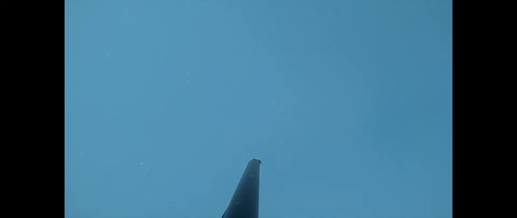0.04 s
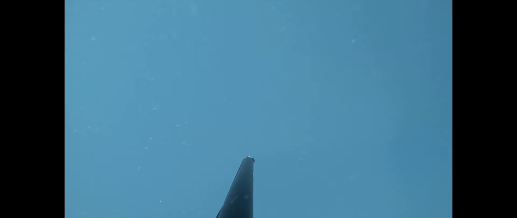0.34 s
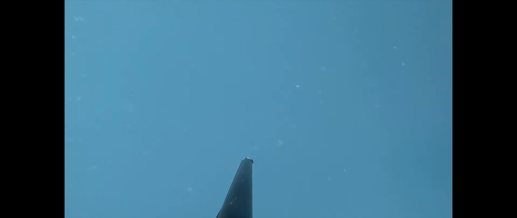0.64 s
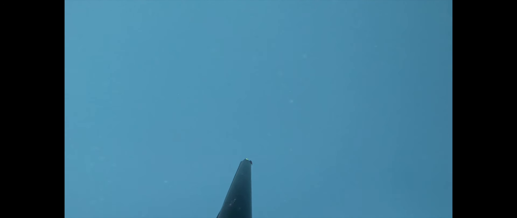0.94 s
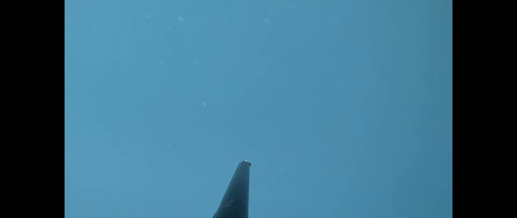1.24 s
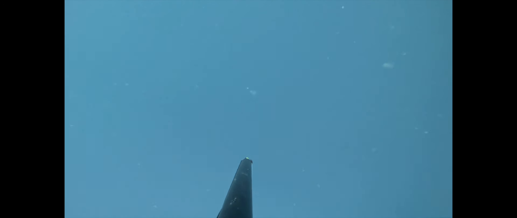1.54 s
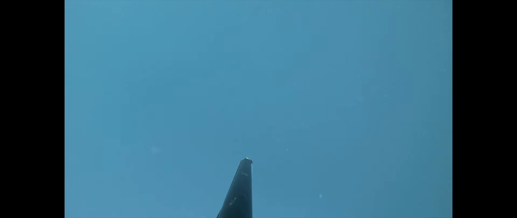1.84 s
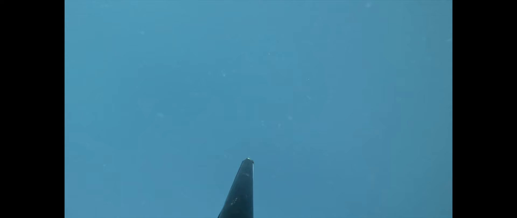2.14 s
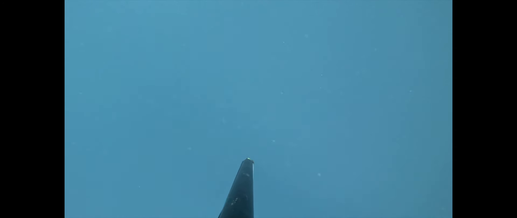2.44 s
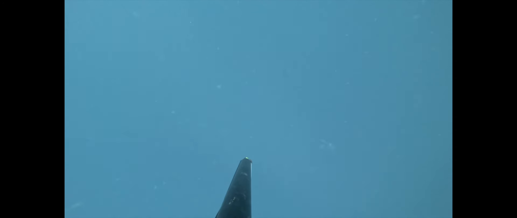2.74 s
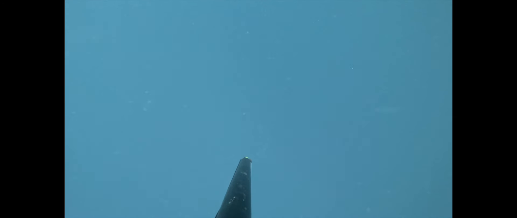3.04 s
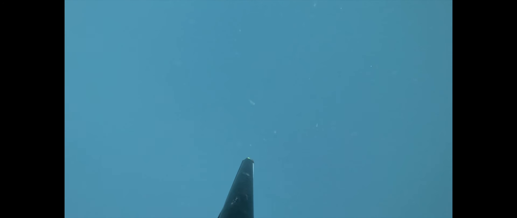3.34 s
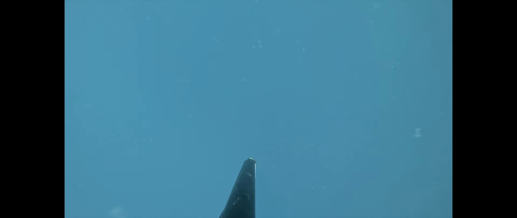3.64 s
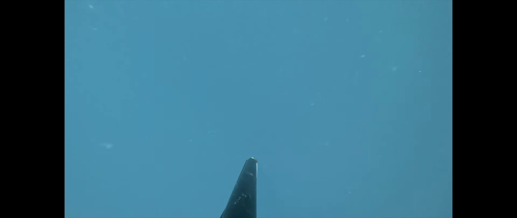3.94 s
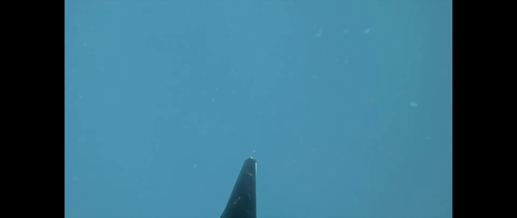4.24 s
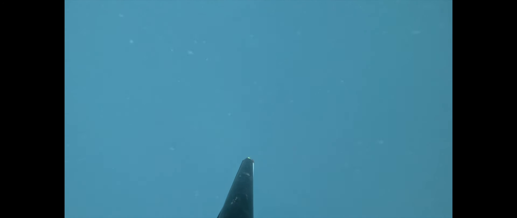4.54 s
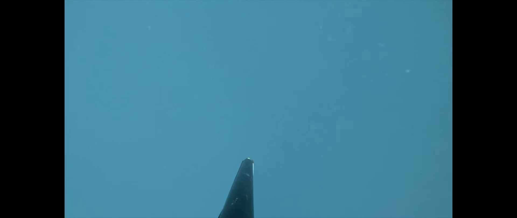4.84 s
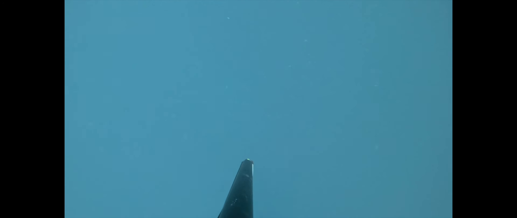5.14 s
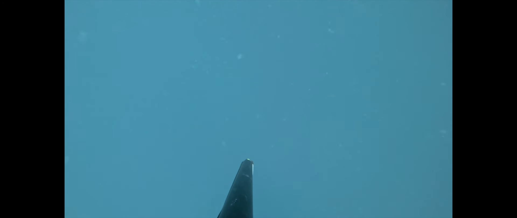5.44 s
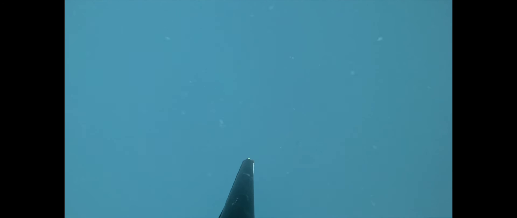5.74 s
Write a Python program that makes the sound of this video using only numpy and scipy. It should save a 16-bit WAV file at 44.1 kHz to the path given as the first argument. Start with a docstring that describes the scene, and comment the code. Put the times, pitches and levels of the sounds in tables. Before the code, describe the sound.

Underwater, eddies rumble and gurgle against the case of a travelling camera, close and muffled. Tiny bubbles fizz, ring and briefly rush past among quiet snaps. A deep thump rocks the housing midway, followed by a few hollow knocks as the flow grows a little brighter. Toward the end a thin, regular click and a faint, quick ringing rattle from loose gear join the rumble.

```python
"""Open water, heard from a camera carried along in a waterproof housing. Eddies rumble and gurgle on the
case, and the wash swells, brightens and hums as it gathers speed. Froth, fine crackle and sharp snaps
sound through the shell; small bubbles ring or burst, and clouds of them rush by. The case is bumped and
rapped, and late on loose gear starts to click and chatter in the flow, all over faint microphone hiss."""
import sys
import numpy as np
from scipy.fft import rfft, irfft, next_fast_len
from scipy.io import wavfile
from scipy.ndimage import uniform_filter1d, map_coordinates

SR = 44100
rng = np.random.default_rng(int(sys.argv[2]) if len(sys.argv) > 2 else 0)


def unload_audio(sound):
    """Save the sound as a 16-bit wav file, at the path given as the first command line argument."""
    columns = np.transpose(np.atleast_2d(sound))
    # keep every value between -1 and 1, then stretch to whole-number steps
    steps = np.round(np.clip(columns, -1, 1) * 32767)
    wavfile.write(sys.argv[1], SR, steps.astype(np.int16))


N = 260631


def amp(db):
    return 10 ** (np.asarray(db) / 20)


def unit(x):
    return x / np.sqrt(np.mean(x ** 2) + 1e-20)


def curves(rows):
    """Automation lanes: one value per sample for each column after the time."""
    s, *cols = np.transpose(rows)
    return [np.interp(np.arange(N) / SR, s, c) for c in cols]


def wobble(rate):
    """A smooth random curve, rate knots a second."""
    knots = rng.standard_normal(int(N * rate / SR) + 4)
    return map_coordinates(knots, [np.arange(N) * rate / SR])


def colour(x, points):
    """An EQ drawn through (frequency [Hz], gain [dB]) points; minimum phase keeps attacks sharp."""
    size = 2 * next_fast_len(x.shape[-1] // 2 + 2048)
    hz, db = np.transpose(points)
    gain = amp(np.interp(np.log(np.fft.rfftfreq(size, 1 / SR) + 1), np.log(hz), db))
    cepstrum = irfft(np.log(gain))
    fold = np.r_[1, np.full(size // 2 - 1, 2), np.zeros(size // 2)]
    response = np.exp(rfft(cepstrum * fold))
    return irfft(rfft(x, size) * response)[..., :x.shape[-1]]


def stereo(pair, side_db):
    """Two unrelated sounds as mid and side; side_db sets the width."""
    mid, side = pair[0], amp(side_db) * pair[1]
    return np.array([mid + side, mid - side])


def add(track, s, sound):
    """Mix a sound in at time s."""
    start = round(s * SR)
    track[start:start + len(sound)] += sound[:N - start]


def swell(sound, s, width):
    """A track on which the sound fades in and out on a bell curve cresting at time s."""
    track, start = np.zeros(N), max(s - 4 * width, 0)
    t = start + np.arange(len(sound)) / SR
    add(track, start, sound * np.exp(-((t - s) / width) ** 2 / 2))
    return track


def churn(spectrum, span):
    """Two turbulent noises of rms 1, their power evened out over span seconds."""
    noise = colour(rng.standard_normal((2, N)), spectrum)
    power = np.abs(uniform_filter1d(noise ** 2, max(int(span * SR), 1)))
    return noise / np.sqrt(power + 1e-12)


def crackle(spectrum, rate, spread_db, share, size=N):
    """Two streams of tiny pops over the hiss of countless far ones, rms 1; share is the pops' power."""
    strength = amp(spread_db * np.minimum(rng.exponential(size=(2, size)), 2.5))
    fires = rng.random((2, size)) < rate / SR
    pops = fires * strength * np.sign(rng.standard_normal((2, size)))
    far = rng.standard_normal((2, size))
    return unit(colour(np.sqrt(share) * unit(pops) + np.sqrt(1 - share) * far, spectrum))


def bursts(hits, tone, t60, attack):
    """Each hit (time [s], peak [dB]) rattles inside the shell: a short burst of shaped noise."""
    track, t = np.zeros(N), np.arange(SR // 10) / SR
    envelope = amp(-60 * t / t60) * (1 - np.exp(-t / attack))
    for s, db in hits:
        burst = colour(rng.standard_normal(len(t)) * envelope, tone)
        add(track, s, amp(db) * burst / np.abs(burst).max())
    return track


def bubble(hz, t60, rise=0.93, attack=0.0006):
    """A bubble rings at its own pitch, which creeps upward."""
    t = np.arange(SR // 10) / SR
    envelope = amp(-60 * t / t60) * (1 - np.exp(-t / attack))
    return envelope * np.sin(2 * np.pi * hz * t * (1 + rise * t))


def water():
    """Big eddies rock the case, smaller ones gurgle, and the wash grows louder and brighter with speed."""
    # slow eddies on the case: (time [s], deep sway level [dB], buffet level [dB])
    rumble_levels = [(0.0, -45, -60.5), (0.42, -48.5, -39.5), (0.56, -45.5, -51), (0.85, -46, -39.5),
                     (1.38, -42, -40.5), (1.55, -50, -45), (2.1, -46.5, -57), (2.54, -37.5, -50),
                     (2.78, -43.5, -49.5), (2.98, -34, -41), (3.17, -44, -49), (3.56, -43, -49.5),
                     (3.73, -45, -43), (4.45, -45.5, -51.5), (5.0, -36.5, -46), (5.33, -43, -41.5),
                     (5.55, -36.5, -48), (5.91, -60, -44.5)]
    # small eddies: (time [s], level [dB])
    gurgle_levels = [(0, -55), (1.1, -54), (1.7, -54.5), (2.0, -56), (2.6, -55), (3.4, -55), (4.8, -54),
                     (5.91, -55)]
    # pace through the water: (time [s], speed [0 is drifting, 1 is fast])
    pace = [(2.6, 0.25), (3.9, 0.9), (5.5, 1.184), (5.91, 1.1)]
    # the five bands of the flow, deepest first: (frequency [Hz], gain [dB])
    sway_tone = [(8, -18), (16, 2), (24, 8), (31, -0.5), (40, -16.5), (400, -120)]
    buffet_tone = [(22, -26.5), (33, -2.5), (42, 0.5), (47, -3), (54, -27.5), (90, -33), (900, -120)]
    gurgle_tone = [(40, -23.5), (60, 5), (80, 1), (112, 3.5), (135, -2.5), (200, -5.5), (270, -10),
                   (350, -29), (600, -36.5), (4000, -120)]
    wash_tone = [(140, -21.5), (230, 8), (295, 11), (360, 2.5), (470, -4.5), (620, -3), (830, -25),
                 (1200, -16.5), (9000, -100)]
    top_tone = [(250, -37), (520, -2), (670, 2.5), (790, -15.5), (1100, -12.5), (5000, -69)]
    sway_db, buffet_db = curves(rumble_levels)
    gurgle_db, = curves(gurgle_levels)
    speed, = curves(pace)
    sway = amp(sway_db + 1) * churn(sway_tone, span=0.15)
    buffet = amp(buffet_db + 1.5) * churn(buffet_tone, span=0.14)
    gurgle = amp(gurgle_db + 1.6 * wobble(22)) * churn(gurgle_tone, span=0.38)
    body = amp(-77 + 14 * speed) * churn(wash_tone, span=0.14)
    top = amp(-106 + 26 * speed) * churn(top_tone, span=0.11)
    wash = amp(2 * wobble(34)) * (body + top)
    return stereo(sway + buffet, side_db=-28) + stereo(gurgle, side_db=-20.5) + stereo(wash, side_db=-10)


def blips(centre_hz, scatter, spread_db, t60, count):
    """Many small bubbles ring at random moments, rms 1."""
    track = np.zeros(N)
    times = rng.uniform(0, N / SR - 0.01, count)
    variations = np.clip(rng.standard_normal((count, 2)), -2, 2)
    for s, (pitch, strength) in zip(times, variations):
        add(track, s, amp(spread_db * strength) * bubble(centre_hz * np.exp(scatter * pitch), t60))
    return unit(track)


def fizz(snap_tone, pops_per_s=17):
    """Froth rings the shell's low resonances, fine crackle its high ones; bubbles tick, pops stand out."""
    # drifting froth and fine crackle: (time [s], level [dB])
    froth_levels = [(0.0, -81), (0.55, -82.5), (0.78, -76.5), (1.25, -78), (1.85, -80.5), (2.15, -77),
                    (2.45, -83), (3.25, -77.5), (3.8, -82.5), (5.91, -79.5)]
    fine_levels = [(0, -81.5), (.36, -81.5), (.46, -76), (.6, -80.5), (1.14, -78), (1.35, -80.5),
                   (2.27, -79.5), (2.45, -80.5), (2.7, -78.5), (2.86, -79.5), (5.91, -79.5)]
    # low and high resonances of the shell: (frequency [Hz], gain [dB])
    froth_tone = [(350, -23), (580, 1.5), (930, -9), (1010, -3), (1130, -1), (1290, 2), (1420, -3.5),
                  (1630, -1), (1950, -5.5), (2300, -13), (3000, -14), (4500, -32.5)]
    fine_tone = [(1500, -30.5), (2500, -17.5), (2950, -5.5), (3600, -10), (4100, -1.5), (4720, -7),
                 (5020, 4.5), (5400, -2), (6600, -5.5), (7200, -2.5), (7800, 1), (8200, -10.5), (9800, -13),
                 (10700, -27.5), (14000, -49)]
    froth_db, = curves(froth_levels)
    fine_db, = curves(fine_levels)
    froth = stereo(crackle(froth_tone, rate=220, spread_db=7.5, share=0.33), side_db=-7)
    chinks = amp(-4.5) * blips(centre_hz=1441, scatter=0.13, spread_db=3, t60=0.049, count=300)
    pips = amp(-14) * blips(centre_hz=3044, scatter=0.1, spread_db=3.5, t60=0.034, count=110)
    sparks = amp(-12) * blips(centre_hz=5840, scatter=0.13, spread_db=1.5, t60=0.012, count=260)
    fine = stereo(crackle(fine_tone, rate=230, spread_db=5.5, share=0.36), side_db=-23.5)
    # near pops: (time [s], peak above the crackle [dB])
    pop_hits = rng.uniform((0, 7), (N / SR - 0.01, 13), (round(pops_per_s * N / SR), 2))
    pops = bursts(pop_hits, snap_tone, t60=0.009, attack=0.0002)
    low_layer = amp(froth_db - 0.62 + 1.4 * wobble(23.96)) * (froth + chinks + pips)
    high_layer = amp(fine_db + 1.3 * wobble(20)) * (fine + sparks + pops)
    return low_layer + high_layer


def hiss():
    """The faint noise of each microphone."""
    tone = [(500, 12.5), (2500, -8.5), (8000, -3), (10000, 3.5), (11500, -12)]
    return amp(-98) * unit(colour(rng.standard_normal((2, N)), tone))


def gurgles_and_hum():
    """Short low gurgles, and one long hum of the wash as it gathers speed."""
    # narrow, unsteady bands of noise: (crest time [s], level [dB], half-length [s], pitch [Hz])
    swells = [(.27, -48.5, 0.031, 86.4), (.46, -53, 0.034, 177), (.97, -54.5, 0.14, 191.7),
              (1.162, -48, 0.04, 106.4), (1.645, -48.5, 0.058, 111.4), (1.81, -56.5, 0.027, 197),
              (2.224, -56.5, 0.03, 206), (2.708, -53, 0.086, 111.7), (3.759, -55, .09, 117.3),
              (4.3, -63, 0.55, 290.4), (4.666, -47, 0.036, 80), (4.67, -58, .05, 301)]
    track = np.zeros(N)
    for s, db, width, hz in swells:
        band = [(hz / 3, -40), (hz / 1.36, -11), (hz, 0), (hz * 1.132, -11), (hz * 20, -120)]
        track += amp(db) * swell(churn(band, span=0.062)[0], s, width)
    return track


def splats():
    """Bubbles that burst against the case give wet ticks with only a hint of pitch."""
    # bursting bubbles: (time [s], peak [dB], band centre [Hz])
    ticks = [(0.289, -56.5, 3540), (0.293, -68, 3760), (0.925, -68, 3080), (3.198, -66.5, 3900),
             (4.202, -57, 4220), (4.211, -62, 4000), (4.2193, -61.5, 4000), (4.364, -61.5, 5600),
             (4.7238, -61.5, 4600), (4.745, -61.5, 4200)]
    track = np.zeros(N)
    for s, db, hz in ticks:
        band = [(hz / 4, -26), (hz / 1.6, -22), (hz / 1.05, -8), (hz, 0),
                (hz * 1.074, -3), (hz * 0.96, -20), (hz * 3, -45)]
        track += bursts([(s, db)], band, t60=0.014, attack=0.0006)
    return track


def raps():
    """Hard contacts give the case a short, hollow knock."""
    # raps on the housing: (time [s], peak [dB])
    knocks = [(0.289, -59), (0.8396, -60.5), (2.2794, -62), (2.7, -59), (4.2022, -50.5), (4.2105, -65),
              (4.2195, -54)]
    # the hollow of the case: (frequency [Hz], gain [dB])
    knock_tone = [(200, -8.5), (520, 18), (850, -1), (1250, 2.5), (1600, -15.5), (2400, -26), (6000, -46)]
    return bursts(knocks, knock_tone, t60=0.028, attack=0.0005)


def bumps(heave_hz=33):
    """A blow rings the water-damped case and heaves it to and fro."""
    # blows on the housing: (time [s], ring peak [dB], heave level [dB])
    blows = [(0.291, -44.5, -41.5), (2.991, -36, -24), (4.204, -55, -26.5), (4.256, -42, -59.5)]
    # modes of the case: (frequency [Hz], level [dB], t60 [s])
    case_modes = [(87.6, -1, 0.24), (138.5, 4.5, 0.15), (201, 7.5, 0.053), (287, -5, 0.066),
                  (381, -4.5, 0.13)]
    # water cushions each blow: (frequency [Hz], gain [dB])
    cushion = [(300, 3), (390, -4), (520, -21.5), (1500, -34)]
    track, t = np.zeros(N), np.arange(SR // 2) / SR
    for s, db, heave_db in blows:
        ring = sum(amp(level + rng.normal(0, 1) - 60 * t / t60) * np.sin(2 * np.pi * hz * t)
                   for hz, level, t60 in case_modes)
        thud = colour(ring * (1 - np.exp(-t / 0.0018)), cushion)
        heave_envelope = amp(heave_db - 60 * t / 0.25) * (1 - np.exp(-t / 0.008))
        heave = heave_envelope * np.sin(2 * np.pi * heave_hz * t)
        add(track, s, amp(db) * thud / np.abs(thud).max() + heave)
    return track


def snaps(snap_tone):
    """Sharp cracks ring the top of the shell; the nearer ones have more body."""
    # snaps in the water: (time [s], level [dB], body offset [dB])
    cracks = [(0.3664, -60.5, -12), (0.664, -58.5, -7), (0.704, -61.5, -14), (0.7523, -62, 5),
              (0.7928, -54.5, 0.5), (0.8402, -59.5, 3), (0.885, -68, -1), (2.279, -59, -11),
              (2.287, -58, -6), (2.3594, -56, -21), (2.6956, -63.5, 2), (2.7083, -58.5, 2),
              (2.7763, -61, -6), (2.9287, -55.5, -7), (3.0223, -62.5, -11), (3.198, -60.5, 2.5),
              (3.3898, -60.5, 3), (3.451, -60.5, -3), (3.892, -60, 5), (4.326, -60, -18), (4.354, -56, -11),
              (4.449, -55.5, -6.5), (4.621, -55, -2), (4.630, -60, -7), (5.556, -59.5, 3)]
    # the midrange under each crack: (frequency [Hz], gain [dB])
    body_tone = [(500, -2.5), (800, -15), (1300, 3), (1900, 3.5), (2300, -11), (3200, -3.5), (4500, -5),
                 (9000, -24.5)]
    crack = bursts([(s, db) for s, db, _ in cracks], snap_tone, t60=0.013, attack=0.0002)
    body = bursts([(s, db + offset) for s, db, offset in cracks], body_tone, t60=0.02, attack=0.0002)
    return amp(-1) * crack + amp(-6) * body


def rushes():
    """Clouds of small bubbles sweep past the case."""
    # frothy passes: (crest time [s], level [dB], half-length [s], band centre [Hz])
    passes = [(0.475, -74, 0.02, 1490), (0.871, -73.5, 0.034, 1030), (1.965, -77.5, 0.036, 2030),
              (2.257, -76, 0.032, 1370), (2.715, -71.5, 0.03, 1360), (3.244, -77, 0.023, 1400),
              (4.431, -75.5, 0.019, 890), (4.686, -72.5, 0.053, 900)]
    track = np.zeros((2, N))
    for s, db, width, hz in passes:
        band = [(hz / 6, -26), (hz / 1.7, -9), (hz, 0), (hz * 1.45, -5),
                (hz * 2.3, -22), (hz * 6, -35), (hz * 20, -70)]
        clouds = crackle(band, rate=1500, spread_db=3, share=0.5, size=SR)
        track += amp(db) * stereo([swell(cloud, s, width) for cloud in clouds], side_db=-24)
    return track


def bubbles(splash_db=-6):
    """Each larger bubble tears off with a tiny splash, then rings."""
    # bubbles pinching off: (time [s], level [dB], pitch [Hz], t60 [s])
    plinks = [(0.632, -59.5, 1540, 0.049), (.692, -62, 1445, 0.052), (0.753, -61, 1258, 0.091),
              (1.568, -60, 1650, 0.028), (1.619, -65, 1230, 0.12), (1.74, -66.5, 1610, 0.073),
              (2.219, -63, 1290, 0.031), (2.713, -58.5, 1380, 0.037), (2.784, -64, 1480, 0.06),
              (4.013, -61.5, 4930, 0.025), (4.055, -62, 1720, 0.048), (5.176, -66.5, 1540, 0.046)]
    track, t = np.zeros(N), np.arange(SR // 10) / SR
    for s, db, hz, t60 in plinks:
        band = [(hz / 4, -18), (hz / 2, -8), (hz, 0), (hz * 2.5, -18), (hz * 4, -35)]
        splash = colour(rng.standard_normal(len(t)) * amp(-60 * t / 0.0067), band)
        add(track, s, amp(db) * (bubble(hz, t60) + amp(splash_db) * splash / np.abs(splash).max()))
    return track


def clicks(start_s=3.9079, period_s=0.17419, fade_in_s=0.57, full_db=-57.5):
    """A turning part clicks once each round, harder as the flow takes hold."""
    # the thin, bright click: (frequency [Hz], gain [dB])
    click_tone = [(1500, -15), (3000, -9.5), (4500, -13.5), (5400, 1.5), (6000, 1.5), (6600, -14.5),
                  (7400, -6), (9000, -23), (12000, -36)]
    times = np.arange(start_s, N / SR, period_s)
    softer_db = 9 * np.clip(1 - (times - start_s) / fade_in_s, 0, 1)
    return bursts(zip(times, full_db - softer_db), click_tone, t60=0.011, attack=0.0003)


def chatter(ring_db=-10):
    """A loose piece scrapes and rings about fifteen times a second, never quite at the same pitch."""
    # its strokes: (time [s], scrape peak [dB])
    strokes = [(4.766, -59.5), (4.8321, -64.5), (4.901, -66), (4.964, -60.5), (5.028, -60.5), (5.092, -61),
               (5.154, -64), (5.221, -61.5), (5.286, -59), (5.3574, -61), (5.4226, -62), (5.496, -61),
               (5.5602, -65), (5.6244, -64), (5.6892, -64.5), (5.757, -65.5), (5.8675, -69)]
    # its modes: (frequency [Hz], level [dB], t60 [s])
    gear_modes = [(1263, 2.5, 0.15), (1487, 2, 0.062), (1805, 2.5, 0.04), (2900, -4.5, 0.11),
                  (3340, -8, 0.036)]
    # its scrape: (frequency [Hz], gain [dB])
    scrape_tone = [(700, -5), (1150, -4.5), (1800, -3), (2300, -13.5), (3100, -1.5), (3600, -8), (4400, -3),
                   (6000, -14.5), (12000, -36)]
    ringing, t = np.zeros(N), np.arange(SR // 6) / SR
    for s, db in strokes:
        ring = np.zeros(len(t))
        for hz, level, t60 in gear_modes:
            decay = amp(level + rng.normal(0, 1.4) - 60 * t / t60)
            detune = 1 + rng.normal(0, 0.0036)
            ring += decay * np.sin(2 * np.pi * hz * detune * t)
        add(ringing, s, amp(db + ring_db) * ring * (1 - np.exp(-t / 0.0019)))
    return ringing + bursts(strokes, scrape_tone, t60=0.076, attack=0.00045)


def housing(x):
    """The shell bends differently over each microphone, shifting phase and level between them."""
    # stereo image of the shell: (frequency [Hz], left phase lead [rad], left over right [dB])
    image = [(61.3, -.12, -2), (137, 0.39, -2.5), (254, 0.78, -3.5), (403, 0.98, -6.5), (746, 1, -3),
             (1000, 0.65, -2), (1470, 0.066, -2.5), (2170, -1.64, 2.5), (2880, -0.54, 2.5), (4000, -1, 0),
             (5070, 0.41, -2.5), (6900, .05, 0)]
    size = next_fast_len(N + SR // 2)
    hz, *cols = np.transpose(image)
    log_hz = np.log(np.fft.rfftfreq(size, 1 / SR) + 1)
    lead, left_db = [np.interp(log_hz, np.log(hz), c) for c in cols]
    half_shift = amp(left_db / 2) * np.exp(1j * lead / 2)
    return irfft(rfft(x, size) * [half_shift, 1 / half_shift], size)[:, :N]


def scene():
    """Water, bubbles and contacts all reach the microphones through the housing."""
    # the bright top of the shell, rung by pops and snaps: (frequency [Hz], gain [dB])
    snap_tone = [(600, -20.5), (1400, -9.5), (2300, -22.5), (3200, -6), (4400, -1), (5100, 10), (6600, -4),
                 (7800, 4.5), (9000, -7.5), (10500, -14.5), (13000, -16), (16000, -46)]
    flow = water() + gurgles_and_hum()
    sparkle = fizz(snap_tone) + rushes() + bubbles() + splats() + snaps(snap_tone)
    contacts = clicks() + chatter() + bumps() + raps()
    return housing(flow + sparkle + contacts) + hiss()


def record(dry, top_hz=11600):
    """The camera keeps nothing above its band limit."""
    size = next_fast_len(N + SR // 2)
    passband = np.fft.rfftfreq(size, 1 / SR) < top_hz
    return irfft(rfft(dry, size) * passband, size)[:, :N]


dry = scene()
out = record(dry)
unload_audio(out)
```